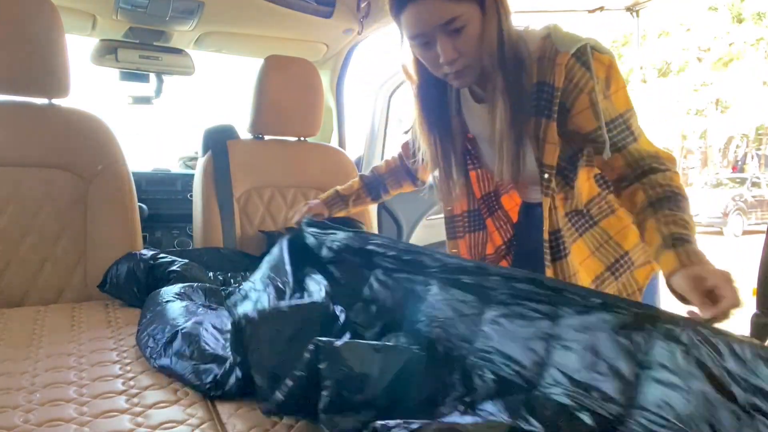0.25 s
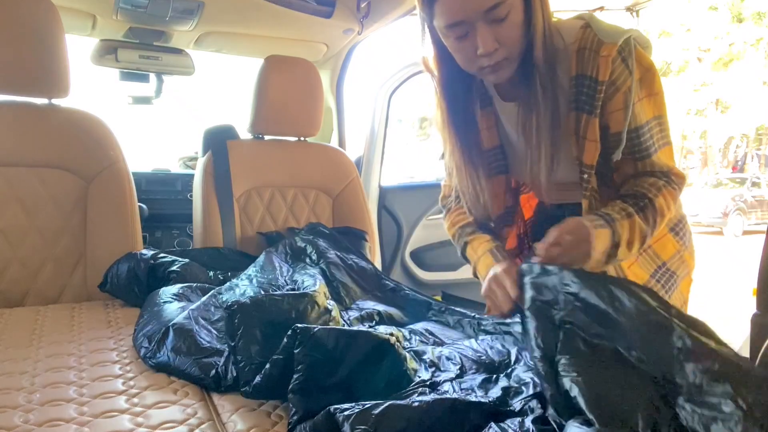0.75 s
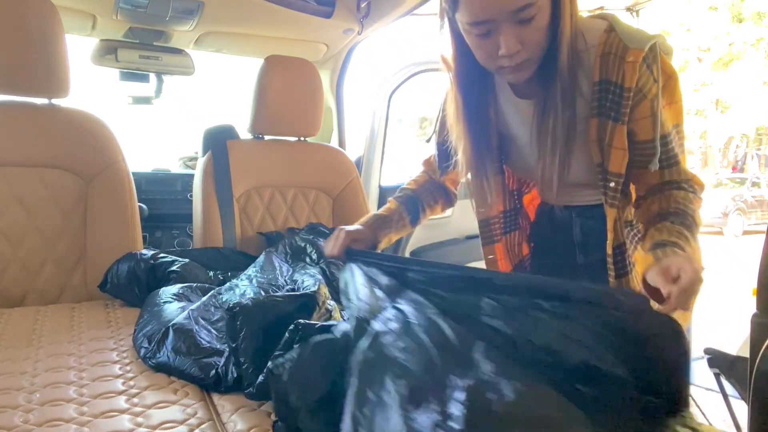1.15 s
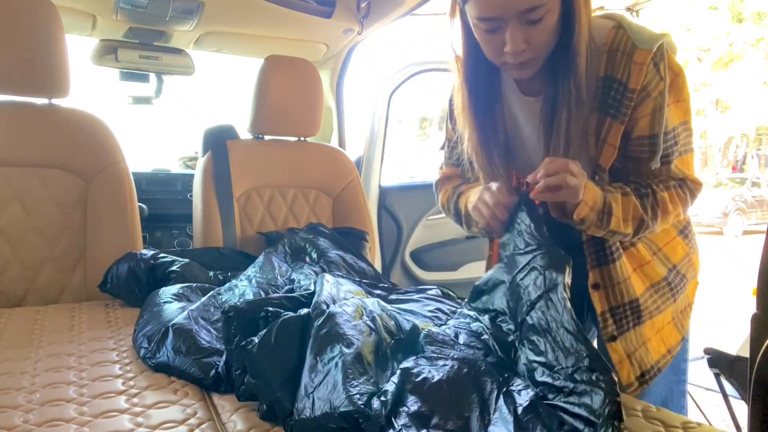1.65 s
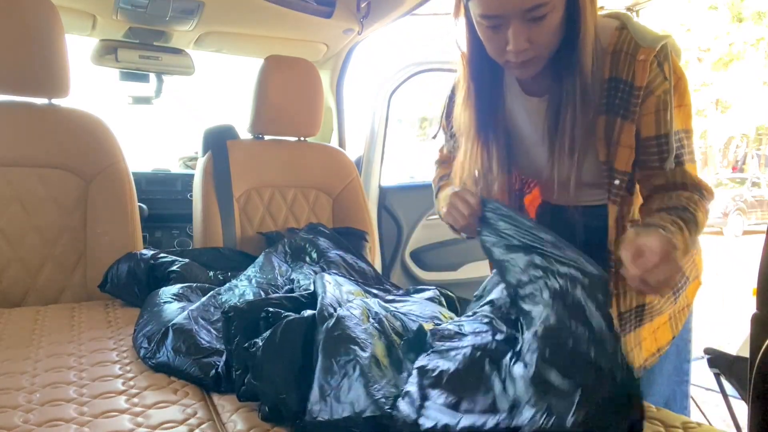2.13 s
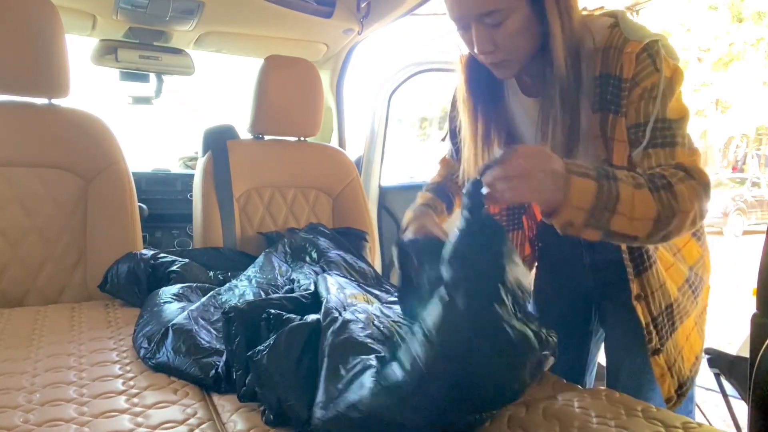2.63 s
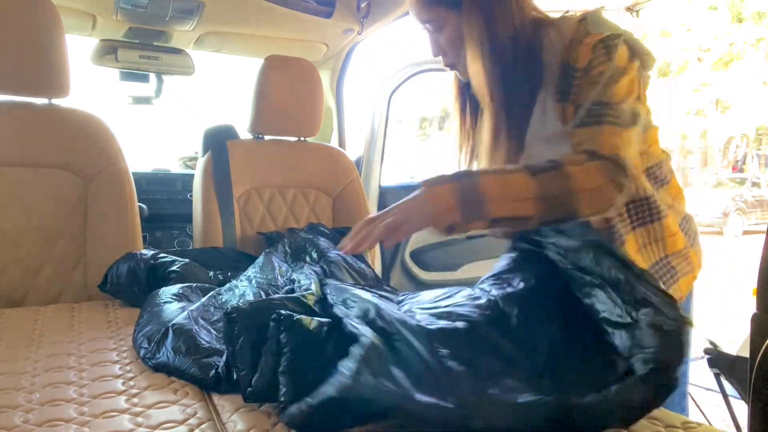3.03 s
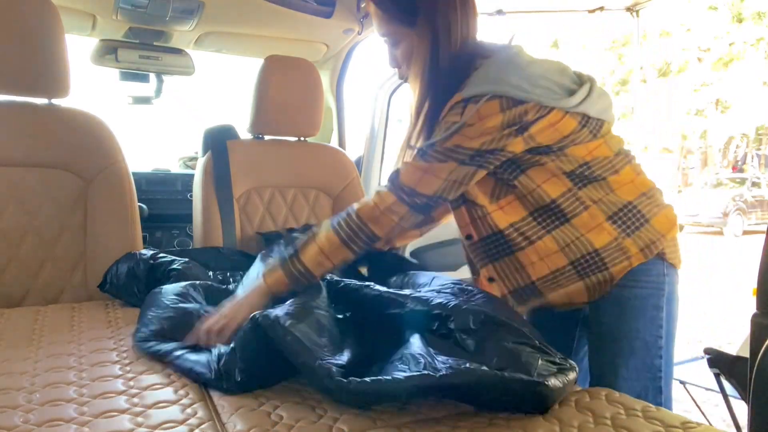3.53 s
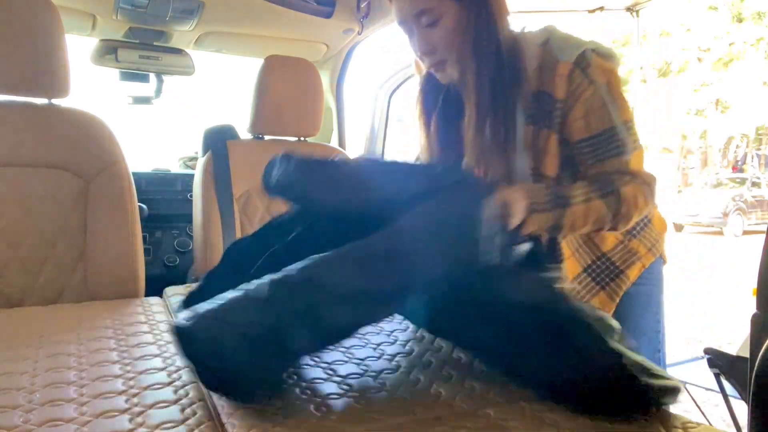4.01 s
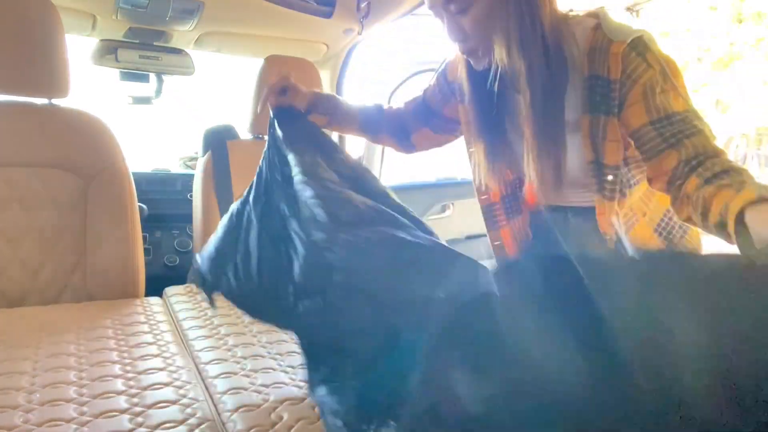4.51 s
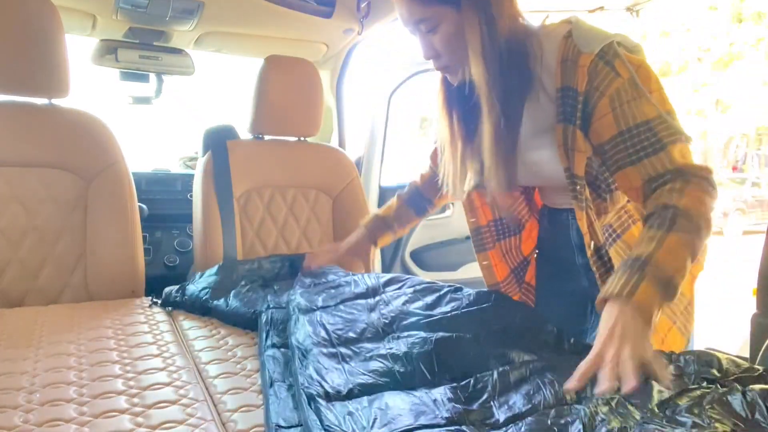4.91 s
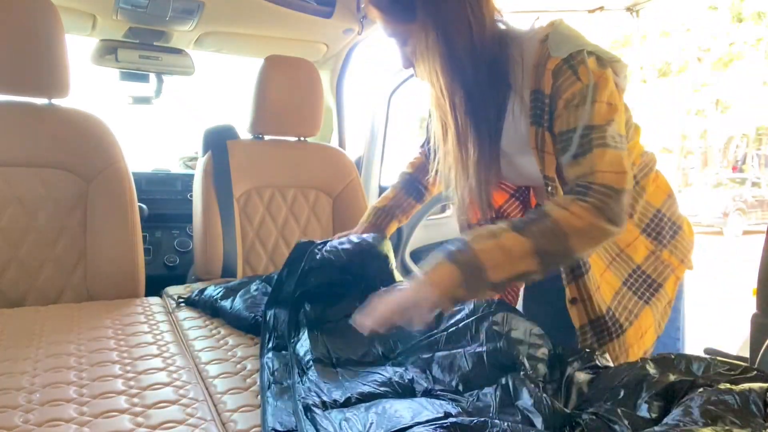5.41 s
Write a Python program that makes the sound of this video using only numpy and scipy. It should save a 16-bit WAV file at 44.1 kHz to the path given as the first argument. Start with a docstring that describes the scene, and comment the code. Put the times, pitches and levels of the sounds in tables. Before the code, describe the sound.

Close stereo pickup in a small padded car. A nylon zipper opens at once with a fast, high buzzing pull, then a slower stroke, a short tug and a last long pull that rises and falls. Slick shell fabric rustles throughout. Later the bag is shaken out with a loud, dull flap and pushed air, then smoothed with soft swishes over a faint low hum.

```python
"""Sleeping bag unzipped in a small car

The nylon zipper opens in three long pulls and a short tug; the slider sings at its tooth rate.
Around and after the pulls the shell rustles, flaps, drags and pushes air, and the pull tab ticks.
Teeth are click trains, the tape is a bank of sines, and cloth is coloured clicks and noise.
Short reflections and resonances of the padded cabin colour zipper and cloth, over a low machine hum."""
import sys
import numpy as np
from scipy import signal
from scipy.fft import rfft, irfft, next_fast_len
from scipy.io import wavfile
from scipy.ndimage import uniform_filter1d

SR = 44100
rng = np.random.default_rng(int(sys.argv[2]) if len(sys.argv) > 2 else 0)


def master(y):
    """Save y as 16-bit WAV."""
    cut = np.clip(np.atleast_2d(y).T, -1, 1)
    pcm = np.round(cut * 32767)  # scale
    wavfile.write(sys.argv[1], SR, pcm.astype(np.int16))


N = 249606
TIME = np.arange(N) / SR

# cloth snapping taut: start_s, peak_db (dB before the cabin), lowest_hz, highest_hz, flutter_t60_s
FLAPS = [(0.674, -42, 150, 900, 0.15), (1.172, -32.5, 526, 1600, 0.059), (4.316, -21.5, 560, 1230, 0.054),
         (4.322, -28.5, 540, 796, 0.066), (4.372, -30, 490, 1600, 0.24), (4.407, -15.5, 410, 1200, 0.053),
         (4.419, -12.5, 395, 1500, 0.04), (4.424, -11, 385, 2570, 0.045), (4.434, -22, 383, 900, 0.054),
         (4.457, -33, 610, 900, 0.093), (4.521, -36, 180, 510, 0.049), (4.529, -27, 240, 520, 0.11),
         (4.564, -38, 280, 520, 0.1), (4.626, -37, 480, 1300, 0.067), (4.685, -32.5, 670, 1050, 0.074),
         (4.726, -38, 460, 900, 0.06), (4.744, -26, 800, 2010, 0.026), (4.749, -25, 500, 2410, 0.03),
         (5.125, -35.5, 1040, 2180, 0.2)]
# spectrum of parting teeth and popping creases: pitch_hz, density_db (dB per Hz)
ZIP_COLOUR = [(20, -66), (150, -13.5), (400, -10.5), (700, -7.5), (1000, -1), (1400, 0), (2200, 0),
              (3100, -2), (4200, -3.5), (7000, -5), (10000, -9), (13500, -19.5)]
# spectrum of the cabin rumble: pitch_hz, density_db (dB per Hz)
RUMBLE_COLOUR = [(18, -54), (30, -8.5), (42, 3.5), (62, 9), (85, -1), (120, -13), (170, -15), (215, -26.5),
                 (270, -46), (500, -59), (1500, -39.5), (12000, -80)]
# slider speed in each pull, before its wobble: time_s, tooth_rate_hz (teeth per second)
FIRST_PULL = [(0, 1990), (.035, 2390), (.055, 2520), (.072, 2540), (.078, 2120), (.088, 2060), (.097, 2300),
              (.128, 2310), (.145, 2440), (.162, 2370), (.172, 2170), (.2, 2200), (.22, 2020), (.236, 1810),
              (.25, 1470), (.265, 1290), (.29, 920), (.33, 250)]
SECOND_PULL = [(.72, 200), (.78, 420), (.825, 970), (.853, 1370), (.89, 1640), (.915, 1760), (.927, 1950),
               (.952, 1940), (.975, 1600), (.99, 1150), (1.02, 980), (1.06, 620), (1.1, 300)]
SHORT_TUG = [(1.11, 300), (1.17, 780), (1.195, 950), (1.212, 1300), (1.24, 600), (1.28, 300)]
LAST_PULL = [(1.875, 150), (1.91, 440), (1.935, 660), (1.975, 770), (2.01, 1120), (2.05, 1320),
             (2.08, 1340), (2.115, 1480), (2.15, 1530), (2.185, 1490), (2.21, 1350), (2.235, 1170),
             (2.255, 980), (2.272, 880), (2.295, 800), (2.33, 250)]


def undb(db):
    """Decibels to gain."""
    return 10 ** (np.asarray(db) / 20)


def unit(x):
    """Scale to rms 1."""
    return x / np.sqrt(np.mean(x ** 2) + 1e-20)


def curves(table):
    """The columns of a table, joined by straight lines in time."""
    s, *columns = np.transpose(table)
    return [np.interp(TIME, s, c) for c in columns]


def outline(points, size):
    """Gain at each frequency bin, joining (Hz, dB) points on a log frequency scale."""
    hz, db = np.transpose(points)
    grid = np.maximum(np.fft.rfftfreq(size, 1 / SR), 1)
    return undb(np.interp(np.log(grid), np.log(hz), db))


def colour(x, points, size=8192):
    """Causal minimum-phase filter with the given (Hz, dB) outline."""
    cepstrum = irfft(np.log(outline(points, size)))
    # folding the cepstrum forward puts all of the response after the onset
    cepstrum[1:size // 2] *= 2
    cepstrum[size // 2 + 1:] = 0
    response = irfft(np.exp(rfft(cepstrum)))
    return signal.fftconvolve(x, response)[:len(x)]


def weigh(x, points):
    """Shape the spectrum by a (Hz, dB) outline without delaying it."""
    size = next_fast_len(N + N // 20)
    return irfft(rfft(x, size) * outline(points, size), size)[:N]


def resonate(x, modes):
    """Ring a set of (Hz, width Hz, dB) resonances side by side."""
    return sum(undb(db) * signal.lfilter(*signal.iirpeak(hz, hz / width, SR), x)
               for hz, width, db in modes)


def noise(size=N):
    """White noise."""
    return rng.standard_normal(size)


def walk(rate):
    """Smooth chance with rms 1, changing rate times a second."""
    k = max(int(SR / rate), 1)
    steps = np.repeat(noise(size=N // k + 2), k)
    return unit(uniform_filter1d(steps, k)[:N])


def fade(t60, size=8192):
    """Exponential decay, losing 60 dB in t60 seconds."""
    return undb(-60 * TIME[:size] / t60)


def swell(start, length, attack, t60):
    """Rise, hold for as long as the movement lasts, then die away."""
    age = TIME - start
    return np.clip(age / attack, 0, 1) * undb(-60 * np.maximum(age - length, 0) / t60)


def grains(rate, spread_db):
    """Tiny clicks at random moments, a few much larger than the rest."""
    sizes = undb(spread_db * np.minimum(rng.exponential(size=N), 5))
    return unit((rng.random(N) < rate / SR) * sizes * np.sign(noise()))


def add(track, s, sound, db):
    """Place a sound at a time with a given peak level."""
    part = track[int(s * SR):][:len(sound)]
    part += undb(db) * sound[:len(part)] / np.abs(sound).max()


def pan(left_db):
    """Left and right gains that set the left louder by left_db."""
    return undb(np.array([[left_db], [-left_db]]) / 2)


def low_end(rumble_db=-43, draught_db=-1, apart_db=-13, left_db=7.5, waver=0.00672):
    """Wavering machine hum and cabin rumble, louder on the left, and air pushed by the swinging bag."""
    # hum partials before the pan: pitch_hz (mean), level_db (central, dB rms)
    hum_partials = [(96.0, -50), (191, -62.5)]
    # air pushed by the bag: start_s, length_s, level_db (before draught_db), left_over_right_db
    gust_moves = [(0, 0.46, -52.5, 1), (0.668, 0.51, -44.5, 6.5), (4.3, 0.23, -41, 3.5),
                  (4.575, 0.26, -44, -5.5)]
    # spectrum of the draught: pitch_hz, density_db (dB per Hz)
    draught_colour = [(20, 2), (45, -3), (80, 7), (120, 0.5), (200, -5), (350, -15.5), (800, -41.5)]
    hum = 0
    for hz, db in hum_partials:
        cycles = np.cumsum(hz * (1 + waver * walk(5))) / SR
        hum = hum + undb(db + walk(4.23)) * np.sqrt(2) * np.sin(2 * np.pi * cycles)
    rumble = undb(rumble_db) * unit(colour(noise(), RUMBLE_COLOUR))
    gusts = sum(undb(db) * pan(lean_db) * swell(s, length, attack=0.041, t60=0.58)
                for s, length, db, lean_db in gust_moves)
    draught = gusts * undb(draught_db) * unit(colour(noise(), draught_colour))
    # a weaker rumble, unrelated between the two microphones
    apart = np.array([unit(colour(noise(), RUMBLE_COLOUR)) for _ in range(2)])
    return (hum + rumble) * pan(left_db) + draught + undb(rumble_db + apart_db) * apart


def wash(x, wet_db, t60, change_hz, count=7, size=4096):
    """Direct sound and short reflections off seats, roof and windows, as decaying noise."""
    echoes = np.zeros(N)
    # the source keeps moving, so one pattern of reflections melts into the next
    place = TIME * change_hz
    for k in range(count):
        away = np.minimum(np.abs((place - k + count / 2) % count - count / 2), 1)
        pattern = noise(size=size) * fade(t60, size=size)
        pattern = pattern / np.linalg.norm(pattern)
        echoes += signal.oaconvolve(x * np.cos(away * np.pi / 2), pattern)[:N]
    return (x + undb(wet_db) * echoes) / np.hypot(1, undb(wet_db))


def boom(size=8192, order=8, boom_db=-1, reach_hz=400):
    """Snaps that reach low enough set the cabin's air booming."""
    # cabin air under a panel of cloth, rung twice: pitch_hz, width_hz and gain_db of each pass
    boom_modes = [(250, 65, -5.5), (382, 58, 1), (705, 45, -2)]
    out = np.zeros(N)
    ring = resonate(resonate(signal.unit_impulse(size), boom_modes), boom_modes)
    for s, db, low_hz, _, _ in FLAPS:
        out_of_reach_db = 20 * np.log10(1 + (low_hz / reach_hz) ** order)
        add(out, s, ring, db + boom_db - out_of_reach_db)
    return out


def microphones(mid, side):
    """A close pair: one hears the wave later, so their difference is a quarter cycle off."""
    # difference of the microphones against their sum: pitch_hz, gain_db
    width = [(60, 12.5), (200, 13), (370, -4.5), (680, 5), (1250, 0), (2300, 0.5), (4200, -1), (6300, 0.5),
             (8200, -27.5), (10000, -28), (12000, 4.5), (14000, 10.5)]
    # left microphone over the right: pitch_hz, left_over_right_db
    lean = [(60, 2), (200, 14), (370, 2), (680, -0.5), (1250, 0.5), (2300, 4), (4200, 3.5), (7800, 0),
            (14000, -0.5)]
    quarter_off = signal.hilbert(side, next_fast_len(N)).imag[:N]
    side = weigh(quarter_off, width)
    ears = [weigh(mid + ear * side, [(hz, ear * db / 2) for hz, db in lean]) for ear in (1, -1)]
    return np.array(ears) / np.sqrt(2)


def puffs(length=0.028, size=4096):
    """A broad fold drops onto the seat and squeezes out one soft wave of air."""
    # falling folds: start_s, peak_db, pitch_hz
    fold_drops = [(0.694, -30, 70), (4.769, -28, 80)]
    out, age = np.zeros(N), TIME[:size]
    for s, db, hz in fold_drops:
        pressure = np.sin(np.pi * np.minimum(age / length, 1))
        add(out, s, pressure * np.sin(2 * np.pi * hz * age), db)
    return out


def drags(attack=0.027, t60=0.1, catch_rate=500, spread=1.0):
    """Cloth dragged over the seat catches and lets go in a coarse scrape of resonated clicks."""
    # scrapes over the seat, before the microphones: start_s, length_s, level_db, centre_hz
    seat_scrapes = [(0.244, 0.055, -51, 413), (0.717, 0.12, -53, 400), (0.86, 0.084, -46, 526),
                    (0.965, 0.055, -47, 1810), (0.996, 0.086, -48.5, 530), (1.13, 0.041, -48, 503),
                    (1.253, 0.044, -55.5, 550), (1.93, 0.067, -49, 1560), (2.264, 0.032, -67, 754),
                    (2.815, 0.081, -57, 920), (3.138, 0.075, -57.5, 685), (3.498, 0.22, -57.5, 580),
                    (3.952, 0.11, -51.5, 610), (4.083, 0.046, -47, 556), (4.6, 0.027, -49, 380)]
    out = np.zeros(N)
    for s, length, db, hz in seat_scrapes:
        panel = [(hz, hz * min(spread, 1), 0)]
        scrape = unit(resonate(resonate(grains(catch_rate, 1.56), panel), panel))
        out += undb(db) * swell(s, length, attack, t60) * scrape
    return out


def handling():
    """Strength of the rub and of the fine hiss: overlapping moves add in power."""
    # hands sliding nylon on nylon, before the rustle trims:
    # start_s, length_s, rub_level_db, hiss_over_rub_db
    hand_moves = [(0, 0.48, -50, -4.5), (0.504, 0.32, -54, -4), (0.695, 0.39, -48, -6),
                  (1.044, .19, -48, -3), (1.305, 0.16, -59, -4.5), (1.583, 0.12, -63, 5),
                  (1.904, 0.42, -59, 1), (2.38, .15, -64, -0.5), (2.45, 0.21, -56, -1),
                  (2.632, 0.36, -51.5, -2.5), (3.02, 0.23, -51, -1.5), (3.28, .3, -56, -2),
                  (3.45, 0.22, -47, -2.5), (3.647, 0.33, -48, 0), (4.012, 0.18, -46.5, -2),
                  (4.25, 0.25, -44.5, -1), (4.51, 0.34, -47.5, -3), (4.925, .27, -49, -1.5),
                  (5.185, 0.26, -54, -1.5), (5.544, 0.22, -52, -4)]
    # between moves the shell keeps settling very quietly
    rub = hiss = undb(-93) ** 2
    for start, length, db, fine_db in hand_moves:
        move = undb(db) * swell(start, length, attack=0.079, t60=0.65)
        rub = rub + move ** 2
        hiss = hiss + (move * undb(fine_db)) ** 2
    # the hands move unevenly
    return np.sqrt([rub, hiss]) * undb(0.7 * walk(22))


def scuffs(hz):
    """Now and then a larger fold lets go with a short scuff of resonated noise."""
    power = signal.fftconvolve(grains(18, 1.5) ** 2, fade(0.05, size=2048))[:N]
    folds = np.sqrt(np.abs(power))
    return unit(resonate(noise() * folds, [(hz, hz / 2, 0)]))


def rustle(rub_db=-2.5, hiss_db=-1, flicker_db=0.26, scuff_db=-11):
    """Folds buckle in a dense crackle while the fine weave hisses."""
    # spectrum of the buckling folds: pitch_hz, density_db (dB per Hz)
    rub_colour = [(120, -2), (300, -8.5), (450, 2), (600, 3), (850, 3.5), (1150, 3), (2000, 1.5),
                  (3500, -2), (6000, -8), (12000, -31)]
    # spectrum of the fine weave: pitch_hz, density_db (dB per Hz)
    hiss_colour = [(1500, -20), (3500, 0), (5500, 1), (8500, 3.5), (11000, 0), (13500, -8.5)]
    rubbing, hissing = handling()
    rub, hiss = [], []
    # the wide shell reaches the microphones' sum and difference unrelated
    for _ in range(2):
        # scuffs of large, middling and small folds
        folds = sum(scuffs(hz) for hz in (750, 1400, 2700))
        rub.append(unit(colour(grains(7000, 1.34), rub_colour)) + undb(scuff_db) * folds)
        hiss.append(unit(colour(grains(22000, 2.65), hiss_colour)))
    flicker = undb(hiss_db + flicker_db * walk(90))
    return np.array(rub) * rubbing * undb(rub_db) + np.array(hiss) * hissing * flicker


def creases(t60=0.07, size=8192):
    """A crease in the shell gives way in a short crisp burst of noise."""
    # popping creases, before the cabin: start_s, peak_db
    crease_pops = [(0.434, -37), (0.448, -38), (1.436, -43), (1.84, -51), (2.541, -42.5), (3.18, -43),
                   (4.406, -31), (4.418, -23), (4.425, -29.5), (4.743, -31), (5.13, -36)]
    out = np.zeros(N)
    for s, db in crease_pops:
        add(out, s, colour(noise(size=size) * fade(t60), ZIP_COLOUR), db)
    return out


def flaps(flutter=0.16, size=8192):
    """Each snap is a push of air and a brief flutter that ring the cabin."""
    # spectrum of a snap: pitch_hz, density_db (dB per Hz)
    flap_colour = [(80, -81), (170, -7), (260, 1.5), (400, -4), (550, -4), (750, -8.5), (1200, -6.5),
                   (2200, -8), (4000, -22), (12000, 4)]
    # resonances of the cabin: pitch_hz, width_hz, gain_db
    cabin_modes = [(353, 78, 5.5), (450, 35, 0), (670, 170, -0.5), (1820, 40, -35)]
    out = np.zeros(N)
    for s, db, low_hz, high_hz, t60 in FLAPS:
        push = flutter * noise(size=size) * fade(t60)
        push[0] += 2
        band = signal.butter(2, [low_hz, high_hz], "band", fs=SR, output="sos")
        push = signal.sosfilt(band, colour(push, flap_colour))
        add(out, s, push + resonate(push, cabin_modes), db)
    return out


def pull_tab(chatter=0.24, chatter_t60=0.14, size=8192):
    """The small metal tab strikes the slider, chatters on it and rings high."""
    # strikes of the tab, before the cabin: start_s, peak_db
    tab_ticks = [(1.84, -58), (2.507, -50), (2.757, -39.5), (2.808, -53), (4.743, -35)]
    # resonances of the tab, rung twice: pitch_hz, width_hz and gain_db of each pass
    tab_modes = [(5000, 400, -12), (8200, 380, 3), (8700, 630, 0), (10500, 600, 3), (11500, 520, 3)]
    out = np.zeros(N)
    for s, db in tab_ticks:
        contact = chatter * noise(size=size) * fade(chatter_t60)
        contact[0] += 2
        add(out, s, resonate(resonate(contact, tab_modes), tab_modes), db)
    return out


def pulling(speed, full_db, taut_s, taut_length, accent_db, snagging, quiet_hz):
    """A pull is louder and smoother with speed and on taut cloth, and ragged once the cloth slackens."""
    quiet_power, catch_hz, max_snag = 5.05, 518, 3
    # taut cloth guides the slider, slack cloth makes it scrape
    taut_snag_db, slack_snag_db = -3, 6
    hz, = curves(speed)
    past = (TIME - taut_s) / taut_length
    taut, slack = np.exp(-past ** 2), np.clip(past - .5, 0, 1)
    db = full_db + accent_db * taut - 10 * np.log10(1 + (quiet_hz / hz) ** quiet_power)
    # a slow slider catches more
    snag = snagging * (1 + (catch_hz / hz) ** 2) * undb(taut_snag_db * taut + slack_snag_db * slack)
    return hz, db, np.minimum(snag, max_snag), slack


def teeth(phase, snag, limp, loose):
    """One click for each tooth that parts; on loose tape it knocks a second time."""
    jitter, knock_lag, knock_share = .017, .43, .8  # shares of a tooth, of a tooth, of the first click
    tooth = np.arange(1, int(phase[-1]))
    # snagging makes the spacing less even
    parts = tooth + jitter * np.interp(tooth, phase, snag) * noise(size=len(tooth))
    at = np.interp(np.concatenate([parts, parts + knock_lag]), phase, np.arange(N))
    # teeth of the left and right tape alternate and click a little differently
    strength = 1 + limp * (-1) ** tooth
    knocks = strength * knock_share * np.interp(tooth, phase, loose)
    strength = np.concatenate([strength, knocks])
    # each click falls between samples, so it is spread over its neighbours
    taps = at.astype(int)[:, None] + np.arange(-4, 6)
    offset = taps - at[:, None]
    shape = np.sinc(offset) * np.sinc(offset / 5)
    return np.bincount(np.clip(taps, 0, N - 1).ravel(), (strength[:, None] * shape).ravel(), N)


def soften(sound, hz, bright_hz=1510, edge_hz=1100):
    """Slow teeth part softly: below bright_hz teeth per second, sound above the edge is dulled."""
    dull = signal.lfilter(*signal.butter(1, edge_hz, fs=SR), sound)
    return dull + (sound - dull) * np.minimum(hz / bright_hz, 1)


def whine(phase, limp, loose, half_db=4, loose_octave_db=6):
    """The tape swings unevenly at the tooth rate and its overtones, each coming and going."""
    # tooth rate and its next multiples, before looseness and flaring: level_db
    multiples_db = [0.5, -4.5, -8.5, -12, -15]
    flare_db, flare_rate = 3, 220    # rms swing, changes per second
    patch_db, patch_rate = 4, 55     # greatest swing, changes per second
    sway, sway_rate = .78, 450       # radians early or late (rms), changes per second
    gains = undb(multiples_db)
    # unlike teeth add the octave below; loose tape favours the octave above
    partials = [(.5, limp * undb(half_db)),
                (1, gains[0] * (1 - loose)),
                (2, gains[1] * undb(loose_octave_db * loose))]
    partials += list(enumerate(gains[2:], 3))
    out = 0
    for k, gain in partials:
        swing = undb(flare_db * walk(flare_rate) + patch_db * np.tanh(walk(patch_rate)))
        out = out + gain * swing * np.cos(2 * np.pi * k * phase + sway * walk(sway_rate))
    return out


def stroke(pull, scrape_db=-8, judder_db=1.5, wobble=.02, stretch_s=.03):
    """One pull: rasp of teeth and scraping slider, and a tape whine that breaks off on slack cloth."""
    speed, *effort, limp, stretched_s, whine_db, quiet_hz = pull
    hz, db, snag, slack = pulling(speed, *effort, quiet_hz)
    start, end = speed[0][0], speed[-1][0]
    # the slider's speed is unsteady, more so as it snags; phase counts teeth
    phase = np.cumsum(hz * np.exp(wobble * snag * walk(450))) / SR
    loose = np.clip((stretched_s - TIME) / stretch_s, 0, 1)
    clicks = teeth(phase, snag, limp, loose) / np.sqrt(hz / SR)
    # the scrape is strongest as each tooth parts
    scrape = noise() * unit(np.exp(-(phase % 1)))
    rasp = soften(colour(clicks + undb(scrape_db) * scrape * snag, ZIP_COLOUR), hz)
    # snagging changes the grain, while the pull alone sets the loudness
    rasp = rasp / np.sqrt(uniform_filter1d(rasp ** 2, size=2000))
    tape = undb(whine_db) * whine(phase, limp, loose) * (1 - slack) / np.sqrt(snag)
    moving = np.clip(np.minimum(TIME - start, end - TIME) / 0.00043, 0, 1)
    return np.array([rasp, tape]) * moving * undb(db + judder_db * walk(70))


def scene():
    """Zipper, cloth and hum in the cabin, built as sum (mid) and difference (side) of two microphones."""
    # pulls: speed_curve (time_s, tooth_rate_hz), full_speed_level_db (before accent and cabin),
    # tautest_s, taut_length_s, taut_accent_db, snagging (before speed and tautness: 1 smooth, 3 ragged),
    # tooth_difference (share between the tapes), stretched_s (tape no longer loose),
    # whine_over_rasp_db (before the whine's own levels), quiet_below_hz (teeth per second)
    zip_pulls = [(FIRST_PULL, -37, .226, 0.075, 0.5, 1.6, 0.014, 0, -3, 1080),
                 (SECOND_PULL, -38.5, 0.941, 0.015, 6, 1.2, 0.29, 0.76, -2, 1080),
                 (SHORT_TUG, -42, 1.19, 0.038, 1.5, 1.48, 0.12, 1.17, -0.5, 890),
                 (LAST_PULL, -39, 2.252, 0.032, 3.9, 1.116, 0.046, 2.065, -2.5, 873)]
    # snaps in the sum and in the difference: trim_db
    snap_trims = [-1.5, -1]
    # tape whine in the sum and in the difference: trim_db
    tape_trims = [-1.5, 0]
    # the zipper lies off to one side, lifting its middle range in the difference: pitch_hz, gain_db
    zip_side_lift = [(450, -0.5), (800, 2), (1500, 1.5), (2500, 0)]

    cloth = rustle()
    clicks, snaps = creases() + pull_tab(), flaps()
    # clicks and snaps stay in one place, so their reflections change slowly
    for channel, trim_db in enumerate(snap_trims):
        cloth[channel] += wash(clicks, wet_db=-6.5, t60=0.053, change_hz=1.0, count=2) + drags()
        cloth[channel] += undb(trim_db) * wash(snaps, wet_db=-1.5, t60=0.068, change_hz=0.96, count=2)
    mid, side = cloth

    rasp, tape = sum(stroke(pull) for pull in zip_pulls)
    # the slider travels, so its reflections change quickly
    zip_mid, zip_side = (wash(rasp, wet_db=7.0, t60=0.062, change_hz=22.05, count=5) + undb(db) * tape
                         for db in tape_trims)
    pair = microphones(mid + zip_mid + boom(), side + weigh(zip_side, zip_side_lift))
    return pair + low_end() + puffs()


def record(dry):
    """The recorder cuts the top, steeply above 13.9 kHz."""
    return signal.sosfilt(signal.ellip(8, .2, 70, 13900, fs=SR, output="sos"), dry)


dry = scene()
out = record(dry)
master(out)
```